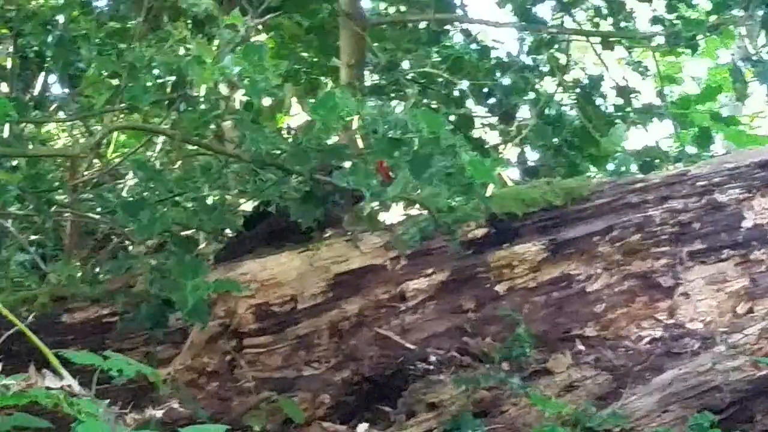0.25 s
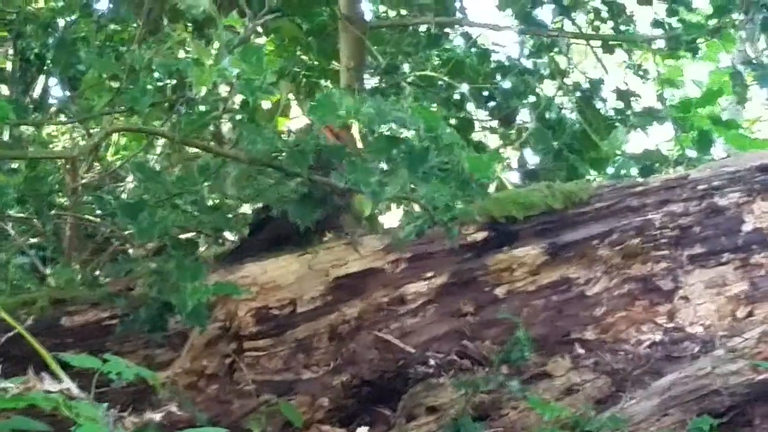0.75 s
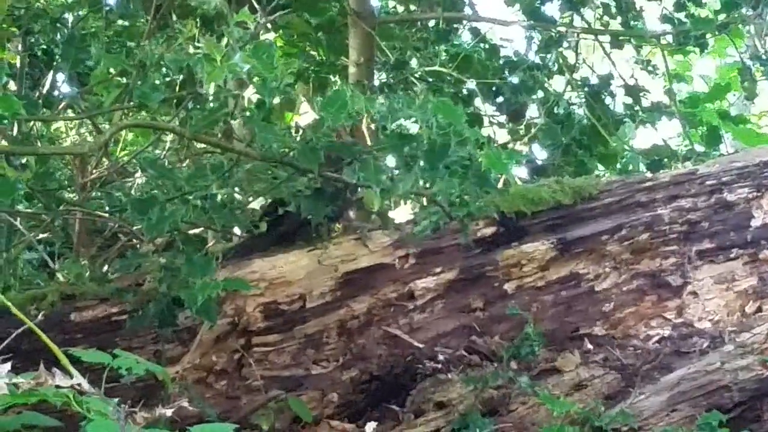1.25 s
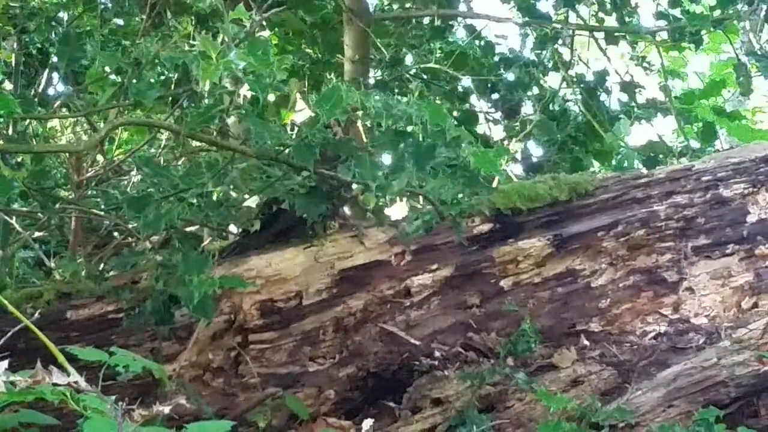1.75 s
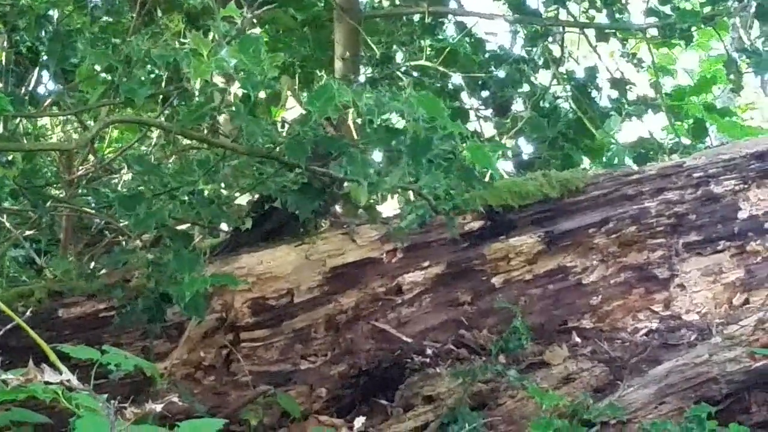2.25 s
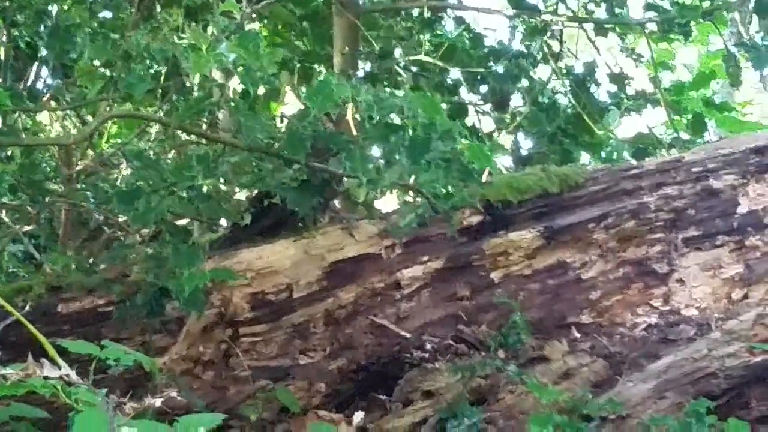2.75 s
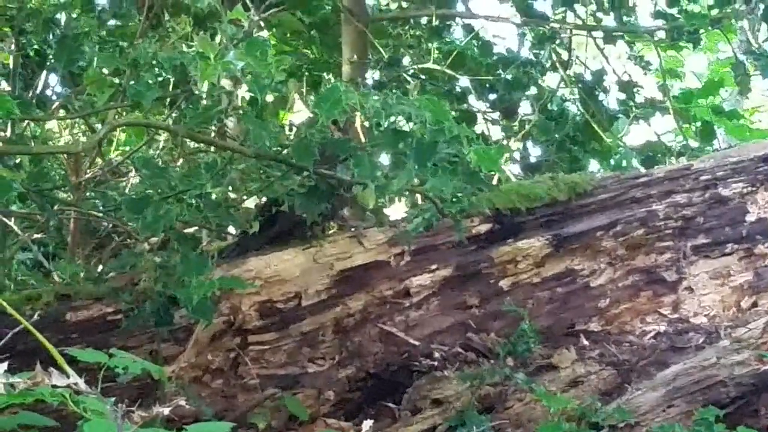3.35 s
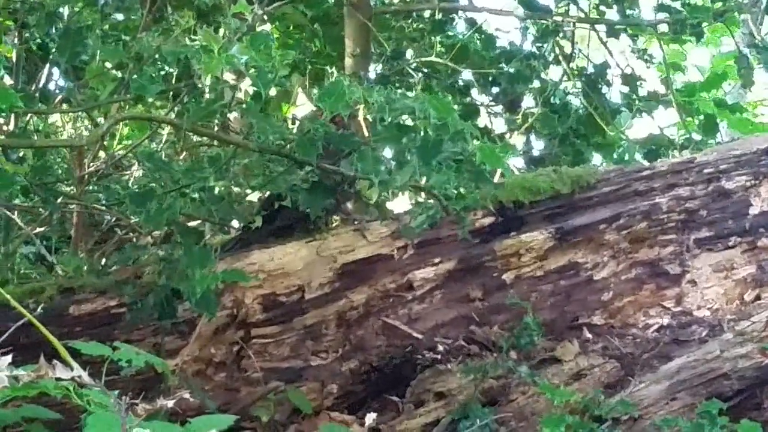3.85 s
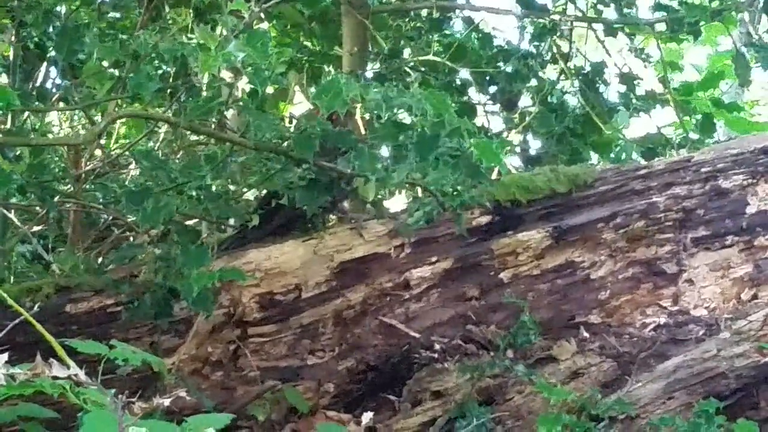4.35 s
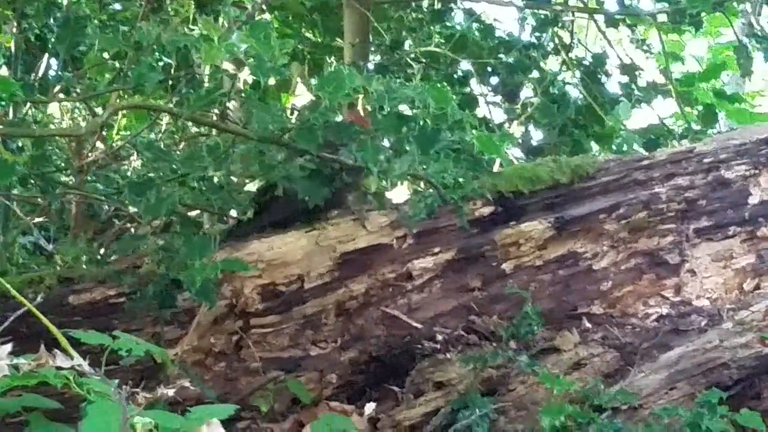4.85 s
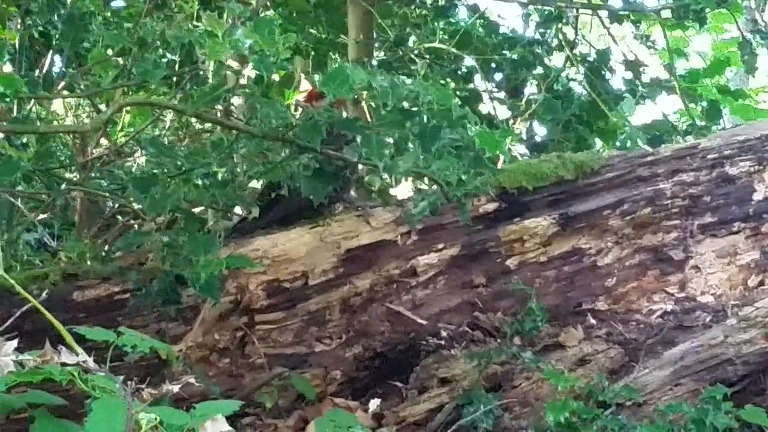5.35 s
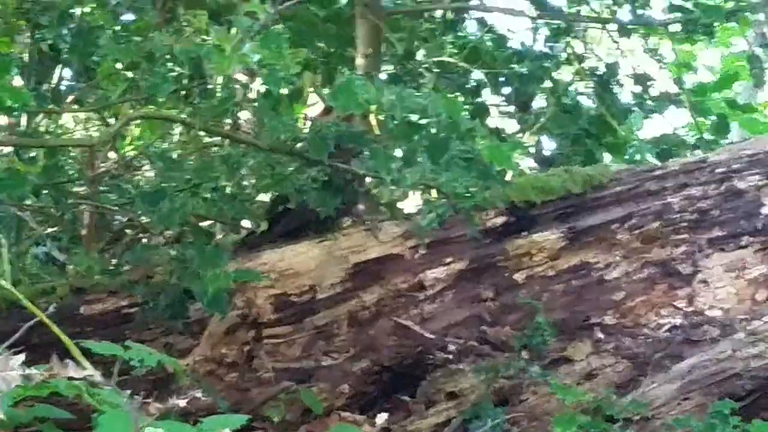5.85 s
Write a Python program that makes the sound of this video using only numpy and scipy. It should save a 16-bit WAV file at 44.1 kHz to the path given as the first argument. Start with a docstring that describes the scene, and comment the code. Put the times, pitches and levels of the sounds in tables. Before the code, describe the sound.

Slow series of raspy woodpecker yelps and occasional sharp wood taps in leafy woods, distant crow-like caws and soft traffic rumble behind.

```python
"""A large woodpecker on a fallen log in a leafy park gives eight short arched calls and pecks the wood now and then.
Its voice is a stack of partials shaped by the throat, with breath noise; each peck is a noise burst plus ringing wood.
Other birds, some with long crow-like caws, call from far off; trunks and leaves scatter calls and pecks as a short
diffuse tail. Behind them are coloured noises for rumbling traffic, hushing trees and hiss, a faint hum, and bumps on
the microphone case. Two microphone ports pick it all up."""
import sys
import numpy as np
from scipy import signal
from scipy.fft import rfft, irfft
from scipy.io import wavfile
from scipy.ndimage import uniform_filter1d

SR = 44100
rng = np.random.default_rng(int(sys.argv[2]) if len(sys.argv) > 2 else 0)


def nominal_scale(level):
    """Amplitude ratio for a level in decibels (scalar or array-like)."""
    x = np.asarray(level, float) / 20
    return 10 ** x


def output_pcm(signal):
    """Save a mono or channel-first signal as 16-bit PCM at the path in sys.argv[1].

    Samples are clipped to [-1, 1] before scaling.
    """
    pcm = np.clip(np.atleast_2d(signal).T, -1, 1) * 32767
    wavfile.write(sys.argv[1], SR, np.round(pcm).astype(np.int16))


N = 268480
TIME = np.arange(N) / SR
BINS_HZ = np.maximum(np.fft.rfftfreq(N, 1 / SR), 1)
LEFT_RIGHT = np.array([[1], [-1]])  # opposite signs for the two ports


def rms_one(x):
    """Scale to unit rms."""
    return x / np.sqrt(np.mean(x ** 2) + 1e-20)


def level_in_time(rows):
    """Read a (t/s, level/dB) table at every sample."""
    seconds, level_db = np.transpose(rows)
    return np.interp(TIME, seconds, level_db)


def at_hz(points, hz):
    """Read a table on a log-frequency axis."""
    table_hz, values = np.array(points).T
    return np.interp(np.log(hz), np.log(table_hz), values)


def drift(rate_hz, size=N):
    """Random wander of unit rms: noise smoothed so that little is left above the rate."""
    r = np.exp(-2 * np.pi * rate_hz / SR)
    settle = 9000  # samples dropped while the filter starts up
    noise = rng.standard_normal(size + settle)
    return rms_one(signal.lfilter([1], [1, -2 * r, r * r], noise)[settle:])


def ring(pushes, modes):
    """Pushes set every mode ringing, each dying away at its own pace."""
    out = 0
    for hz, level_db, t60 in modes:
        r = nominal_scale(-60 / (t60 * SR))
        w = 2 * np.pi * hz / SR
        strike = [0, nominal_scale(level_db) * np.sin(w)]
        out = out + signal.lfilter(strike, [1, -2 * r * np.cos(w), r * r], pushes + 1e-18)
    return out


def coloured(x, spectrum):
    """Filter a signal by a spectrum table."""
    return irfft(rfft(x) * nominal_scale(at_hz(spectrum, BINS_HZ)), N)


# how alike the two ports hear noise from all around: f/Hz, likeness (1 = the same, 0 = unrelated)
PORT_LIKENESS = [(60, 1), (150, 0.93), (370, 0.56), (930, 0.14), (2330, -0.045), (5810, 0.081),
                 (14500, -0.034)]


def diffuse(spectrum):
    """Stereo noise of a given colour and unit rms, alike in both ports mainly in the bass."""
    mid, side = rfft(rng.standard_normal((2, N)))
    alike = np.clip(at_hz(PORT_LIKENESS, BINS_HZ), -1, 1)
    pair = np.sqrt(1 + alike) * mid + np.sqrt(1 - alike) * side * LEFT_RIGHT
    return rms_one(irfft(pair * nominal_scale(at_hz(spectrum, BINS_HZ)), N))


# how throat and open bill shape the voice: f/Hz, level/dB
THROAT_SHAPE = [(300, -40), (620, -19), (1000, -24), (1270, -6), (1420, 4), (1600, 0), (1950, 0),
                (2200, -9), (2580, -8), (2750, -30)]


def voice(pitch_hz, half_db, slope_db, jitter, hoarse):
    """Partials at half-pitch steps through the throat; unsteady pitch and a noisy shimmer make it harsh."""
    size = len(pitch_hz)
    pitch_hz = pitch_hz * (1 + jitter * drift(98, size=size))
    turns = np.cumsum(pitch_hz) / SR
    out = 0
    for k in np.arange(2, 13) / 2:  # 1, 1.5, 2 ... 6 times the pitch
        half_line_db = half_db if k % 1 else 0
        weaken_db = slope_db * max(k - 3, 0)  # the source weakens above its third partial
        gain = nominal_scale(at_hz(THROAT_SHAPE, k * pitch_hz) + half_line_db + weaken_db)
        shimmer = 1 + hoarse * drift(300, size=size)
        out = out + gain * shimmer * np.sin(2 * np.pi * (k * turns + rng.random()))
    return np.sqrt(2) * out


# effort swells from the edge level, holds, and drops back
CALL_S, ATTACK_S, RELEASE_S, EDGE_DB = 0.14, 0.013, 0.017, -6
# pitch leaps up, eases into the top, then sinks to the end pitch
START_HZ, END_HZ, FALL_S = 430.5, 484.2, 0.083
LEAP = 0.593  # power under 1: the rise is steepest at its start
# the falling part warbles, then the warble fades
WARBLE_AFTER_S, WARBLE_HZ, WARBLE_DEPTH, WARBLE_FADE_S = 0.066, 45, 0.05, 0.03
# colour of the breath noise: f/Hz, level/dB
BREATH_COLOUR = [(2500, -87), (3200, -22.5), (5000, -22), (7000, -22), (9000, -37.5), (12000, -96)]
# each near call: start t/s, top pitch f/Hz, rise to the top t/s, effort level/dB,
# level/dB of the half lines that come from weak-strong pulse pairs
NEAR_CALLS = [(.91, 654.6, 0.05, -45.5, -2), (1.693, 655.3, .044, -43.5, -5.5),
              (2.37, 640.5, 0.047, -45.5, -7), (3.09, 629, .049, -45, -9.5), (3.61, 627.6, .056, -45, -7),
              (4.132, 624.5, .056, -45, -14), (4.7, 615, 0.054, -44.5, -17),
              (5.308, 614, 0.057, -41.5, -21)]


def calls():
    """The near bird: its tone, and the breath that rasps past the bill."""
    tones, effort = np.zeros(N), np.zeros(N)
    t = TIME[:int(CALL_S * SR)]
    swell_db = np.interp(t, [0, ATTACK_S, CALL_S - RELEASE_S, CALL_S], [EDGE_DB, 0, 0, EDGE_DB])
    since = np.maximum(t - WARBLE_AFTER_S, 0)
    warble_fade = np.clip(2.2 - since / WARBLE_FADE_S, 0, 1)
    warble = 1 - WARBLE_DEPTH * np.sin(2 * np.pi * WARBLE_HZ * since) * warble_fade
    for start, top_hz, rise_s, level_db, half_db in NEAR_CALLS:
        climb = np.abs(np.sin(0.5 * np.pi * t / rise_s)) ** LEAP
        sink = np.cos(0.5 * np.pi * np.clip((t - rise_s) / FALL_S, 0, 1)) ** 2
        rising = START_HZ + (top_hz - START_HZ) * climb
        falling = END_HZ + (top_hz - END_HZ) * sink
        pitch_hz = np.where(t < rise_s, rising, falling) * warble
        span = slice(int(start * SR), int(start * SR) + len(t))
        effort[span] = nominal_scale(level_db + swell_db)
        tones[span] = voice(pitch_hz, half_db, slope_db=-9, jitter=0.005, hoarse=0.22)
    breath = coloured(rng.standard_normal(N), BREATH_COLOUR)
    return effort * tones, effort * breath


# the near voice reaches the left port late: f/Hz, phase by which left leads [radians]
LEFT_LEAD = [(500, 0), (1200, -2.4), (1600, -3.0), (1900, -3.3), (2550, -6.0), (4000, -10)]


def voice_at_ports(near):
    """The near voice at each port, half the phase gap given to either side."""
    lead = np.exp(0.5j * at_hz(LEFT_LEAD, BINS_HZ) * LEFT_RIGHT)
    return irfft(rfft(near) * lead, N)


CRACK_S, THUD_DELAY_S, REBOUND_S = 0.004, 0.006, 0.011  # both delays count from the start of the crack
REBOUND_DB = -11.5  # relative to the landing push
# bill on wood: t/s, crack level/dB before colouring, push level/dB on the trunk
PECK_TIMES = [(0.2975, -43.5, -39), (0.9176, -52.5, -41.5), (1.2134, -42, -35.5), (4.8563, -43, -43.5),
              (4.9495, -55, -63)]
# colour of splintering wood: f/Hz, level/dB
CRACK_COLOUR = [(600, -13), (1200, 5.5), (1550, 12.5), (2400, 3.5), (3200, -9), (4400, -8), (5400, 1),
                (6400, -4.5), (8700, -1.5), (9800, -15.5), (13000, -16.5), (15000, -13)]
# how the hollow trunk rings: f/Hz, level/dB, time to fall by 60 dB t/s
HOLLOW_TRUNK = [(109.5, -4, 0.55), (184, -6, 0.089), (216, 4.5, 0.059), (317, 3, 0.047), (413, -3.5, 0.094),
                (637, 1, 0.038), (944, 9, 0.011), (1260, -22, 0.012)]


def pecks():
    """A few ms of splintering, a rustle of falling chips, and just after it the thud of the trunk."""
    splinters, pushes = np.zeros((2, N)), np.zeros(N)
    t = TIME[:SR // 5]
    chips = nominal_scale(-8) * np.exp(-t / 0.018) + nominal_scale(-16) * np.exp(-t / 0.06)
    shape = (t < CRACK_S) + chips
    for s, crack_db, thud_db in PECK_TIMES:
        at = int(s * SR)
        splinters[:, at:at + len(t)] += nominal_scale(crack_db) * shape * rng.standard_normal((2, len(t)))
        # the bill lands, then lifts off
        pushes[at + int(THUD_DELAY_S * SR)] = nominal_scale(thud_db)
        pushes[at + int(REBOUND_S * SR)] = -nominal_scale(thud_db + REBOUND_DB)
    contact = np.hanning(int(0.0014 * SR))  # each push is spread over 1.4 ms
    soft_pushes = np.convolve(pushes, contact / contact.sum())[:N]
    return coloured(splinters, CRACK_COLOUR), ring(soft_pushes, HOLLOW_TRUNK)


FAR_START_SAG = 0.7  # sag of the start as a share of the end sag
# far birds: t/s, length t/s, top pitch f/Hz, sag of the end below the top [0-1], level/dB before throat and air
DISTANT_CALLS = [(0.16, 0.15, 673, 0.26, -70), (.55, 0.096, 694, 0.18, -67.5), (0.613, 0.27, 560, .1, -63),
                 (1.264, 0.17, 545, 0.05, -67.5), (1.403, 0.33, 566, 0.2, -62),
                 (1.488, 0.099, 685, .06, -63), (4.788, .14, 685, 0.1, -61.5),
                 (5.142, 0.092, 654, .24, -61.5), (5.563, 0.14, 654.5, 0.42, -60),
                 (5.957, 0.12, 602, .19, -60)]


def far_calls():
    """Calls of birds far off, some of them long caws: a rise to the top pitch, then a longer fall."""
    out = np.zeros(N + SR)
    for start, length, top_hz, sag, level_db in DISTANT_CALLS:
        u = np.linspace(0, 1, int(length * SR))  # progress through the call
        arch = 1 - sag * np.interp(u, [0, 0.3, 0.4, 1], [FAR_START_SAG, 0, 0, 1])
        pitch_hz = top_hz * uniform_filter1d(arch, size=400)
        tone = voice(pitch_hz, half_db=-14, slope_db=-5, jitter=0.009, hoarse=0.3)
        swell = np.sqrt(np.sin(np.pi * u) + 1e-9)
        out[int(start * SR):][:len(u)] += nominal_scale(level_db) * swell * tone
    return out[:N]


def through_foliage(far):
    """Moving leaves break up the line of hearing to the far birds, so their direct sound flutters."""
    direct_share = 0.55  # direct sound relative to what feeds the scatter
    return direct_share * nominal_scale(5 * drift(12)) * far  # flutter of 5 dB rms


# how fast scattered sound dies: f/Hz, time to fall by 60 dB t/s
SCATTER_T60 = [(200, 0.14), (1500, 0.42), (3000, 1), (8000, 0.58), (14000, 0.19)]


def woods(x):
    """Scatter from trunks and leaves: noise that swells, then dies band by band, its own in each port."""
    t = TIME[:SR * 3 // 4]
    edges = 150 * 2 ** np.arange(0, 7, 0.5)  # half-octave bands, Hz
    tails = 0
    for low, high in zip(edges, edges[1:]):
        sos = signal.butter(2, [low, high], "band", fs=SR, output="sos")
        band = signal.sosfilt(sos, rng.standard_normal((2, 2, len(t))))
        tails = tails + band * nominal_scale(-60 * t / at_hz(SCATTER_T60, np.sqrt(low * high)))
    swell = 1 - np.exp(-t / 0.008)
    tails = rms_one(tails * swell) / np.sqrt(len(t))
    # moving leaves keep swapping the sound between two sets of paths, which blurs held tones
    sway = 1.8 * drift(20)
    paths = x * np.array([np.cos(sway), np.sin(sway)])[:, None]
    return signal.fftconvolve(paths, tails, axes=2)[:, :, :N].sum(axis=0)


# swell of the rumble: t/s, level/dB
TRAFFIC_SWELL = [(0.0, -45.5), (0.34, -47.5), (0.46, -50.5), (0.8, -44), (2.9, -48), (3.24, -44),
                 (4.51, -43.5), (4.56, -40), (5.6, -38.5), (6.09, -44.5)]
# colour of the rumble: f/Hz, relative level/dB per Hz
RUMBLE_COLOUR = [(12, -50), (20, -15), (43, 1), (75, 4), (123, -0.5), (189, -22.5), (221, -28.5),
                 (300, -29.5), (390, -81), (660, -120)]


def traffic():
    """Far engines: a swelling rumble of noise and one faint wavering hum."""
    rumble = nominal_scale(level_in_time(TRAFFIC_SWELL) + 0.64 * drift(29.0)) * diffuse(RUMBLE_COLOUR)
    hum_hz = 223 * (1 + 0.00831 * drift(2.6))
    hum = nominal_scale(-66 + 4.2 * drift(5.4)) * np.sin(2 * np.pi * np.cumsum(hum_hz) / SR)
    return rumble + hum


# swell of the hush: t/s, level/dB
HUSH_SWELL = [(0.0, -57), (0.29, -56), (0.69, -59), (1.08, -55), (1.64, -57), (5.66, -54), (6.09, -55.5)]
# colour of the hush: f/Hz, relative level/dB per Hz
HUSH_COLOUR = [(88, -37.5), (150, -1), (380, -8.5), (409, -8.5), (435, -9), (594, -12), (715, -9.5),
               (1100, -17), (1490, -13), (2900, -31), (3770, -51), (6380, -120)]


def hush():
    """The hush of the trees: low coloured noise whose level wanders a little."""
    return nominal_scale(level_in_time(HUSH_SWELL) + 0.8 * drift(4)) * diffuse(HUSH_COLOUR)


# swell of the hiss: t/s, level/dB
HISS_SWELL = [(0.0, -70.5), (0.9, -77), (1.12, -71.5), (2.8, -77.5), (5.43, -71), (6.09, -75)]
# colour of the hiss: f/Hz, relative level/dB per Hz
HISS_COLOUR = [(1590, -34), (2700, -8), (3960, 1.5), (4280, -2), (5300, 0), (5850, -9), (6500, -0.5),
               (8700, -5), (10200, -28.5), (11500, -5), (14700, -6)]


def hiss():
    """Leaves and microphone hiss together: high coloured noise that swells and sinks."""
    return nominal_scale(level_in_time(HISS_SWELL)) * diffuse(HISS_COLOUR)


# hand on the case: t/s, push level/dB
CASE_BUMPS = [(1.766, -48), (3.267, -43), (3.32, -36)]
# how the case rings: f/Hz, level/dB, time to fall by 60 dB t/s
CASE_RING = [(90, 0, 0.12), (170, -1, .03)]


def bumps():
    """Fingers shifting on the case push one port and pull the other."""
    pushes = np.zeros(N)
    for s, level_db in CASE_BUMPS:
        pushes[int(s * SR)] = -nominal_scale(level_db)
    return ring(pushes, CASE_RING) * LEFT_RIGHT


def scene():
    """Calls, pecks and their scatter over traffic, the hush of the trees, hiss and bumps."""
    near, breath = calls()
    crack, thud = pecks()
    far = far_calls()
    direct = voice_at_ports(near) + through_foliage(far) + crack + thud
    # the breath is heard only by way of the scatter
    scatter = woods(nominal_scale(-10) * near + breath)
    scatter += woods(far + nominal_scale(-12) * crack[0] + nominal_scale(-12) * thud)
    return direct + scatter + traffic() + hush() + hiss() + bumps()


def low_pass(x):
    """Removes everything above the highest recorded frequency."""
    return signal.sosfilt(signal.butter(12, 15110, fs=SR, output="sos"), x)


CUTOFF_HZ = 14700
# how the ports differ: f/Hz, left minus right level/dB
PORT_TILT = [(60, -1.5), (110, -0.5), (200, -1), (370, 0), (690, -1.5), (1270, 1.5), (2330, 7),
             (4290, -6.5), (7890, -6), (14500, 8.5)]


def record(dry):
    """The two ports favour different bands; the top is cut."""
    tilt = nominal_scale(0.5 * at_hz(PORT_TILT, BINS_HZ) * LEFT_RIGHT)
    mix = irfft(rfft(dry) * tilt * (BINS_HZ < CUTOFF_HZ), N)
    return low_pass(mix)


dry = scene()
out = record(dry)
output_pcm(out)
```